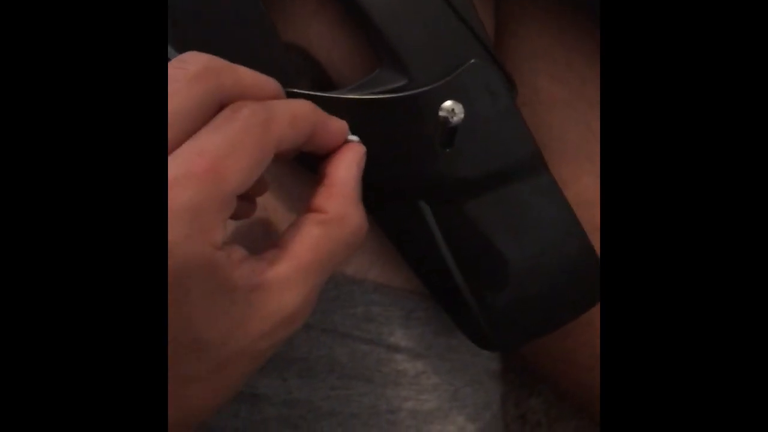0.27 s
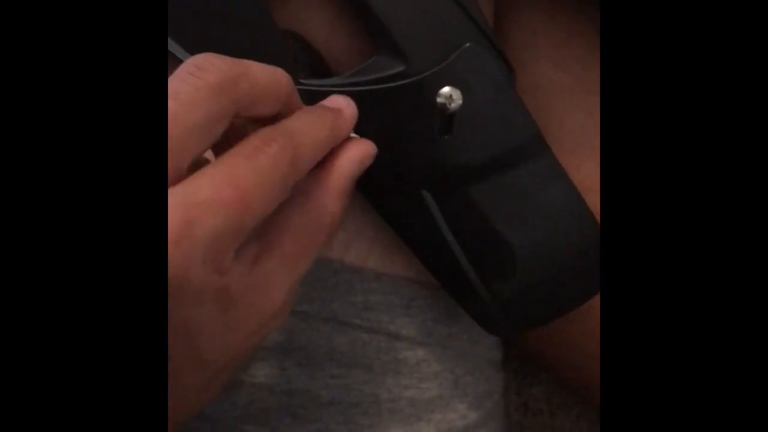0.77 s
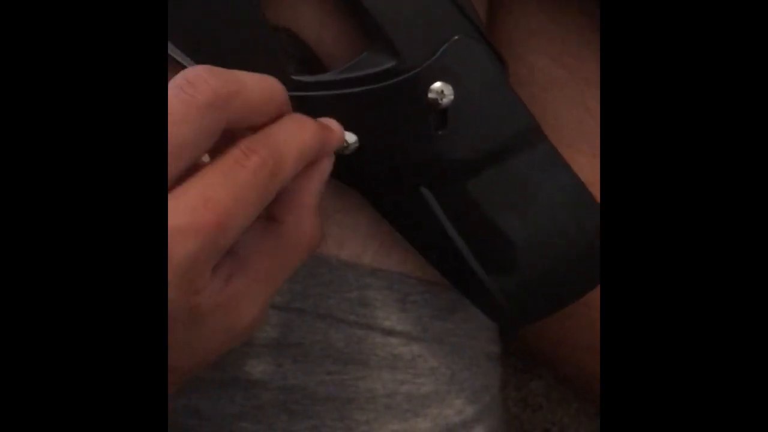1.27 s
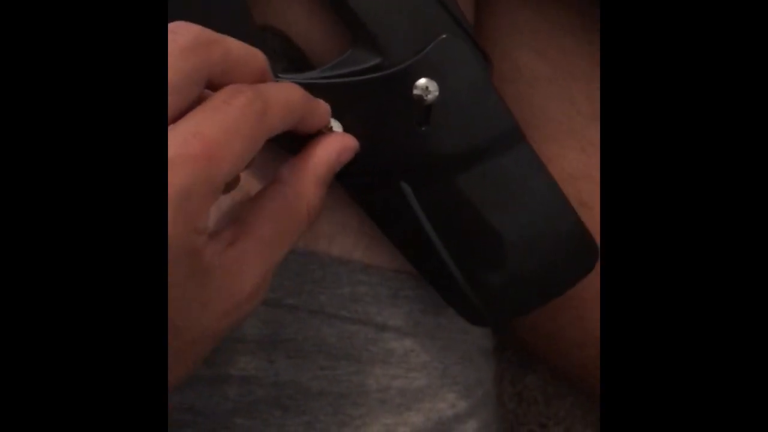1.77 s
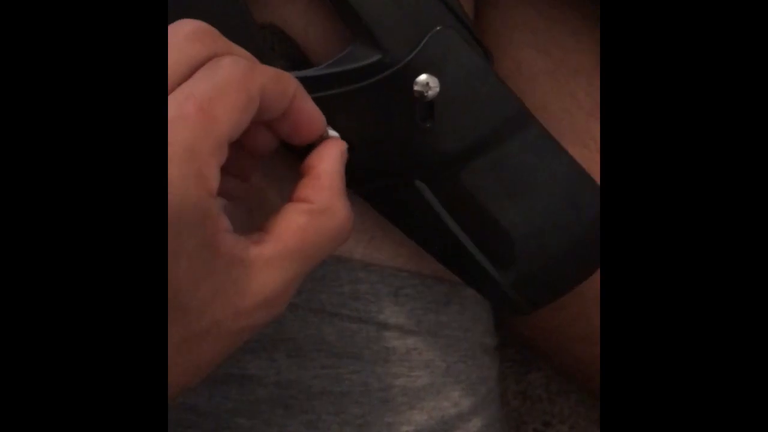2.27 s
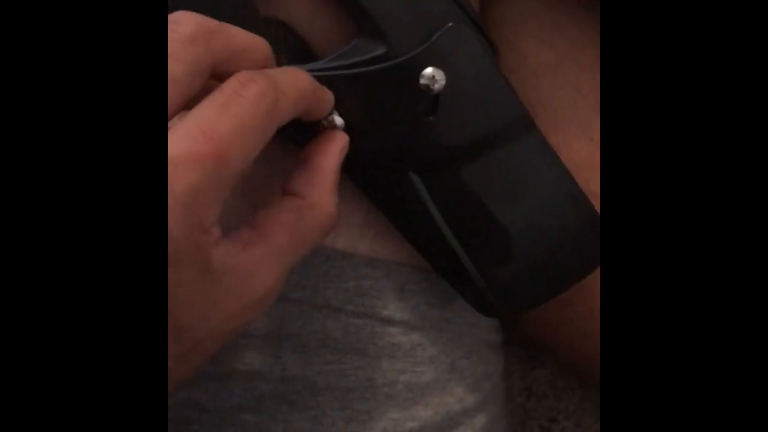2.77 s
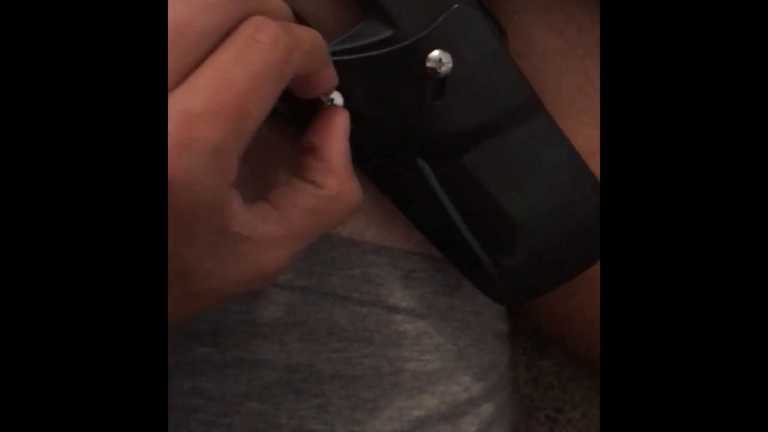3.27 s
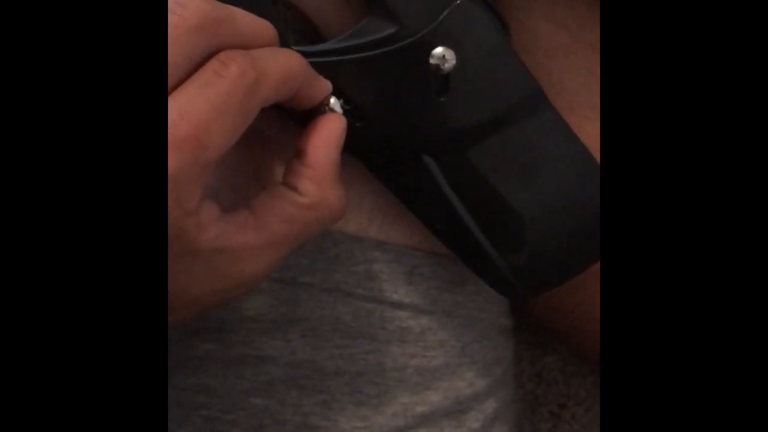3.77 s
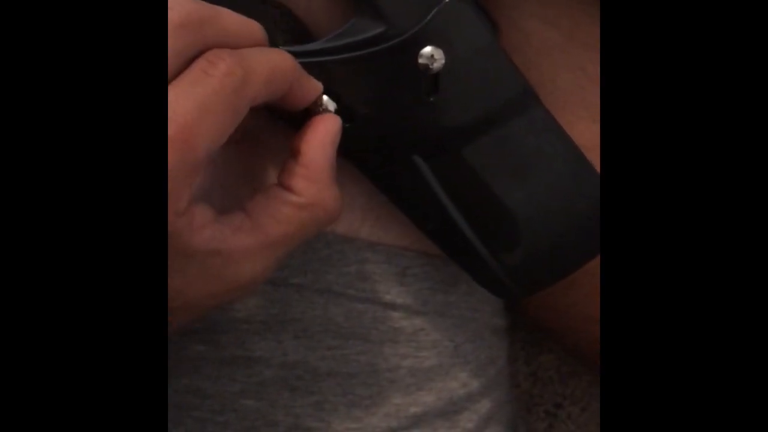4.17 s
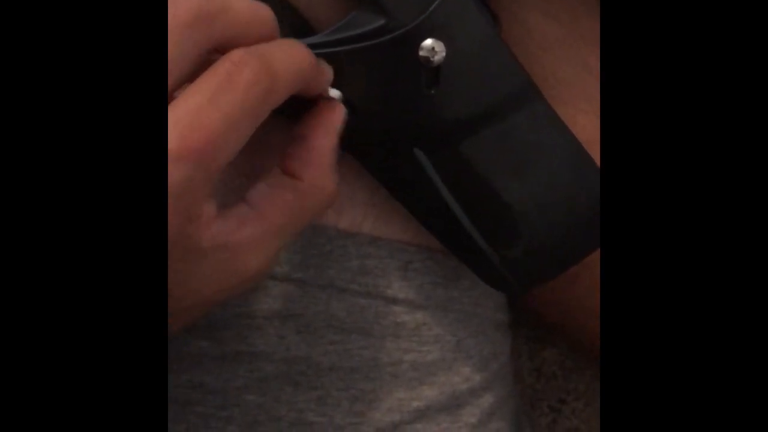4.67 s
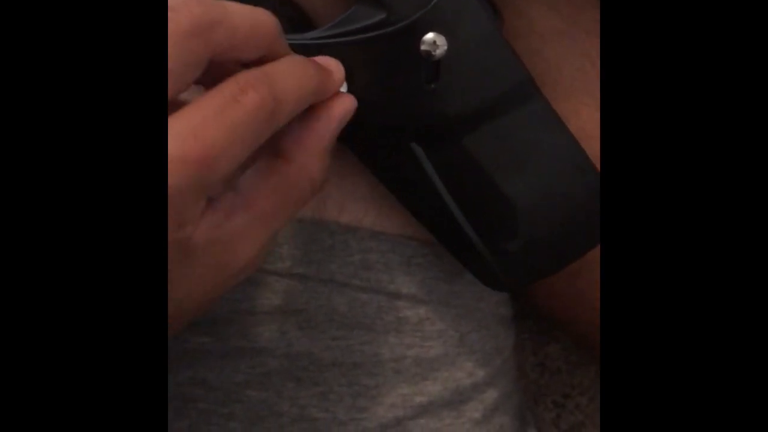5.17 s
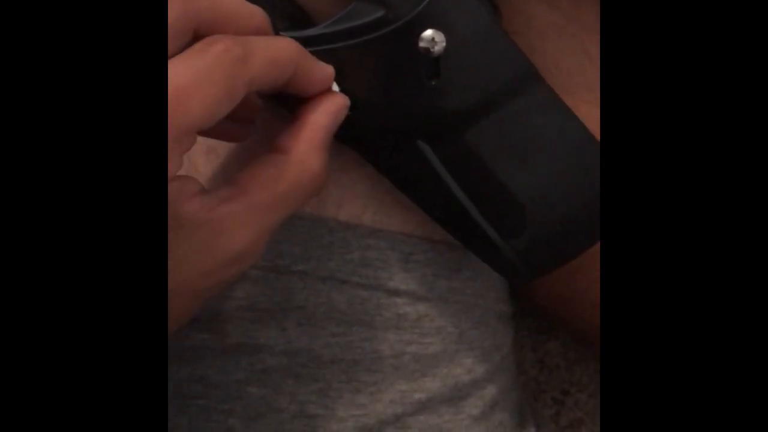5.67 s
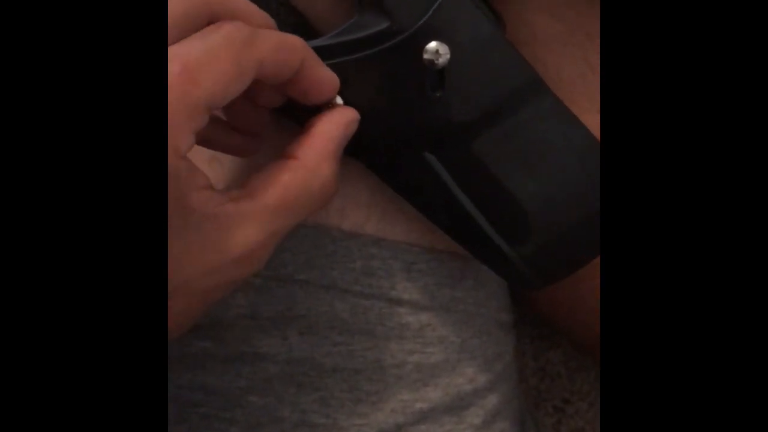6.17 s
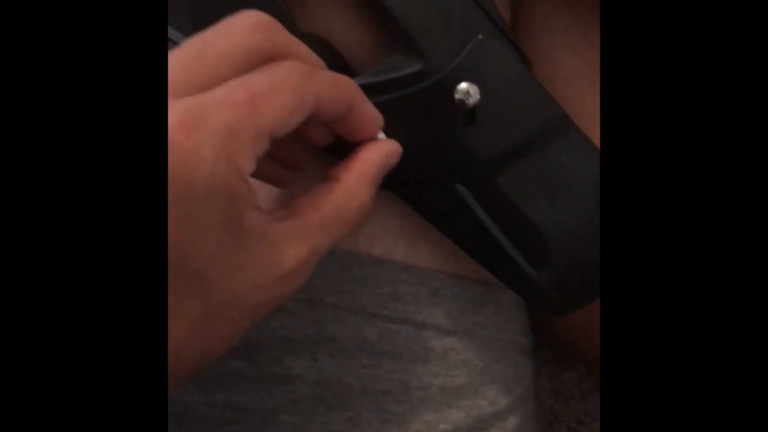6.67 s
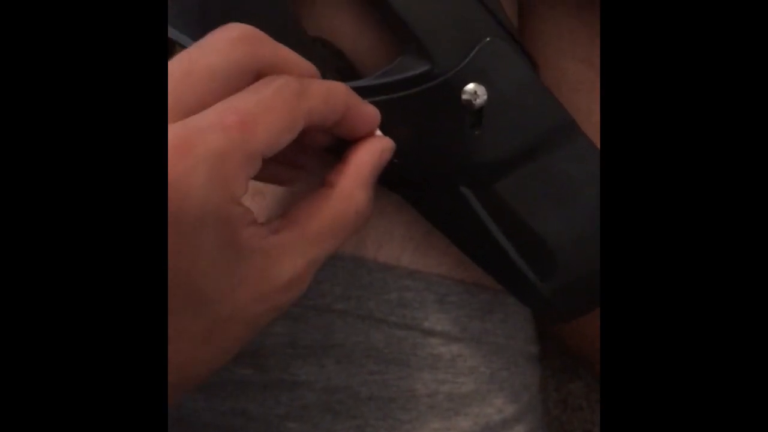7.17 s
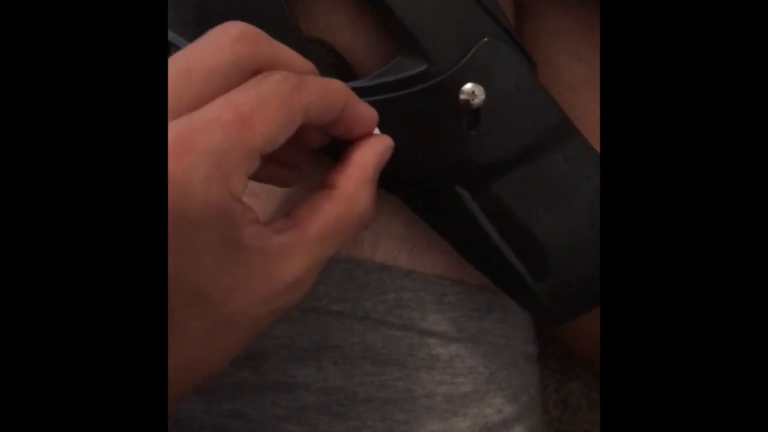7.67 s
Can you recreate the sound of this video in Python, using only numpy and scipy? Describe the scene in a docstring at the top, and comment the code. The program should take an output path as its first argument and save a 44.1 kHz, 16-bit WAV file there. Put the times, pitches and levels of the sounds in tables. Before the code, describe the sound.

Close to the microphone in a quiet room, a small metal screw is tried in the hole of a hard plastic helmet. Light taps lead to two quick clusters of sharp clicks, then tiny thread ticks and faint finger rubbing. A single snap, another cluster and a last snap follow, with lulls between them. The helmet thuds softly now and then, and appliances hum faintly behind it.

```python
"""Small screw on a plastic helmet

Close microphone, quiet room. Fingers try a metal screw in the hole of a hard helmet: it taps, skids and
snaps, ringing the modes of the shell, and its thread catches in tiny ticks. Fingertips rub the plastic,
the helmet thuds softly on a knee, and appliances hum faintly behind it all.
After the sharpest snaps the recorder holds a coarser, hissier range for a moment."""
import sys
import numpy as np
from scipy import signal
from scipy.fft import rfft, irfft, next_fast_len
from scipy.io import wavfile
from scipy.ndimage import uniform_filter1d, map_coordinates

SR = 44100
rng = np.random.default_rng(int(sys.argv[2]) if len(sys.argv) > 2 else 0)


def materialize(psi):
    """Save the field psi as 16-bit PCM at rate SR to the path in sys.argv[1].

    A 1-D psi becomes a single channel; in a 2-D psi each row is a channel.
    """
    bounded = np.clip(np.atleast_2d(psi).T, -1, 1)
    quanta = np.round(bounded * 32767).astype(np.int16)
    wavfile.write(sys.argv[1], SR, quanta)


N = 348387

# screw on shell: t/s, click level/dB, shell knock/dB re click, metal tick/dB re click,
# ping of the screw/dB re clack of the plastic (together the click), favoured shell resonance f/Hz
TAPS = [(0.1456, -40.5, 0.5, -21.5, -12, 2260), (0.2213, -36.5, -3, -0.5, 7, 1240),
        (0.3787, -58, 8, -8, 4, 1270), (0.5582, -72, 14.5, -5, -4, 1230),
        (0.7096, -45, 10.5, -10.5, -2, 1230), (0.7131, -20.5, -10, 0.5, 9, 1340),
        (0.7181, -21, -10, -3, 1.5, 1610), (0.7285, -37.5, -3.5, -9, 2, 1360),
        (0.7756, -44.5, 1.5, -13, 5, 2140), (0.8322, -41.5, -1.5, -18, -9, 1590),
        (0.8408, -35, -4, -4, 4, 1310), (1.1162, -33.5, -4.5, -18, -1.5, 1310),
        (1.1241, -23, -15, -15.5, 8, 2300), (1.1395, -32.5, -4, -14, 2.5, 2300),
        (1.159, -36.5, -1, -3, -2, 1360), (1.1746, -26.5, -12, -6.5, 4, 2220),
        (1.176, -35.5, -1, 4, 0, 2150), (1.1931, -36.5, -1.5, -16, 8, 1580),
        (1.3864, -51, 5, -7.5, 9, 1310), (1.4537, -51.5, 2, -25, 3, 1310), (1.5388, -44.5, 0, -5, 4, 1270),
        (1.6689, -48, -5, -14, 1, 2340), (1.698, -53.5, -21, -13, 3, 1270), (1.713, -46, -6, -11, 2, 1285),
        (1.9098, -55, -4.5, -12, 2, 1700), (2.2129, -56, -0.5, -13.5, -0.5, 2680),
        (2.3338, -21, -6.5, -1, 5.5, 1290), (2.574, -52, 1, -7, -6, 1140), (2.59, -39, 0, -18.5, -9, 1280),
        (2.6189, -37.5, 1, -10, -1, 2240), (2.7246, -52, -5, -5.5, -1, 2130),
        (2.8175, -56, -1, -6.5, -5, 2200), (3.0989, -36.5, 1, -28, 4.5, 1190),
        (3.3804, -58.5, 8.5, -10.5, -9.5, 1710), (4.25, -63, 3.5, -15.5, -11.5, 1360),
        (4.4769, -55.5, 9.5, -3, -3.5, 900), (4.7817, -62.5, 11.5, -17, -4.5, 1360),
        (4.918, -51.5, 12, -22.5, -7, 2300), (4.9221, -26.5, -7.5, 2, 5.5, 1510),
        (4.9974, -32, -4, -9, -2.5, 2150), (5.0077, -28.5, -2.5, -7, 7, 2240),
        (5.011, -22, -7.5, -5.5, 4.5, 1340), (5.524, -55.5, -3, -11.5, -4, 1570),
        (6.5965, -56, 6.5, -8, 1, 2145), (6.6074, -44.5, -3, -5.5, 5, 1524),
        (6.839, -47.5, -6, -12.5, 1, 1083), (6.917, -53, 2.5, -5.5, 3.5, 980),
        (7.2726, -19.5, -9, 2, 0, 2310), (7.3396, -41.5, -3.5, -9.5, 0, 1340),
        (7.394, -44.5, -4, -1.5, 9.5, 1360), (7.5559, -50.5, -2.5, -9, -4, 1074),
        (7.7189, -64, 12.5, -3, 5, 1590)]
LIGHT_TOUCH_DB = -54.5  # reference click level for thread ticks and scrapes


def amp(db):
    """Decibels to amplitude."""
    return 10 ** (np.asarray(db) / 20)


def unit(x):
    """Scale to rms 1."""
    return x / np.sqrt(np.mean(x ** 2) + 1e-20)


def along(points, hz):
    """Interpolate (f/Hz, value) points on a log frequency axis."""
    f, v = np.transpose(points)
    return np.interp(np.log(hz + 1), np.log(f + 1), v)


def filtered(x, response):
    """Apply a gain that is a function of frequency."""
    n = x.shape[-1]
    m = next_fast_len(n + 8192)
    return irfft(rfft(x, m) * response(np.fft.rfftfreq(m, 1 / SR)), m)[..., :n]


def noise(spectrum, size=N):
    """Noise of rms 1, coloured by (f/Hz, relative level/dB) points."""
    return unit(filtered(rng.standard_normal(size), lambda hz: amp(along(spectrum, hz))))


def wobble(rate):
    """A smooth random curve, rate knots a second."""
    knots = rng.standard_normal(int(N * rate / SR) + 4)
    return map_coordinates(knots, [np.arange(N) * rate / SR])


def add(track, s, sound):
    """Mix a sound in at s seconds."""
    part = track[max(round(s * SR), 0):][:len(sound)]
    part += sound[:len(part)]


def swells(peaks, rise_s, fall_s):
    """An envelope that builds up to each (t/s, level/dB) peak and dies away."""
    out, t = np.zeros(N), np.arange(-SR // 8, SR // 8) / SR
    for s, db in peaks:
        add(out, s + t[0], amp(db) * np.exp(-np.maximum(-t / rise_s, t / fall_s)))
    return out


def room_tone(hiss_db=-71.0, rumble_trim_db=0.5, sway_db=0.07, drift_rad=0.42):
    """Slightly unsteady appliance hum over the rumble of the room and thin microphone hiss."""
    hum_lines = [(59.3, -63.5), (96.8, -64), (119.2, -70), (145, -80)]  # appliance tones: f/Hz, rms level/dB
    rumble_levels = [(0.0, -57), (0.44, -61), (2.55, -59.5), (2.9, -61), (7.68, -59.5), (7.9, -61)]  # rumble of room and hand-held microphone: t/s, level before trim/dB
    rumble_colour = [(18, -32.5), (32, -14), (45, -1), (75, -1.5), (105, -3), (145, -8), (180, -15.5),
                     (310, -16), (480, -23), (1200, -27.5), (2200, -37), (5000, -56.5)]  # its spectrum: f/Hz, relative level/dB
    hiss_colour = [(200, -11), (2000, 0.5), (3700, 3), (4900, -1), (5600, 3), (6800, -1), (7700, -4),
                   (8700, 0), (9000, 3), (9300, -2), (10400, -5), (13000, 2.5), (14000, 1.5), (15600, 4)]  # steady hiss: f/Hz, relative level/dB
    t = np.arange(N) / SR
    hum = sum(amp(db) * np.sqrt(2) * np.sin(2 * np.pi * hz * t + drift_rad * wobble(5.4))
              for hz, db in hum_lines)
    rumble_db = rumble_trim_db + np.interp(t, *np.transpose(rumble_levels)) + sway_db * wobble(6.2)
    return hum + amp(rumble_db) * noise(rumble_colour) + amp(hiss_db) * noise(hiss_colour)


def contacts(rows, crack_db, crack_t60, scatter_db, hardening=0.17,
             rise_cycles=0.7, focus_db=5, focus_octaves=0.25, detune=0.014):
    """One blow per row (columns as TAPS): screw and shell ring under a noisy crack."""
    modes = [(227, -14, 0.043), (390, -17.5, 0.042), (659, -15, 0.049), (924, -6.5, 0.019),
             (1177, -2, 0.025), (1340, -1.5, .032), (1610.5, -3.5, 0.029), (1812, -5, 0.031),
             (2143, -1, 0.02), (2312, -2, .024), (2575, -6.5, 0.02), (3234, -4, 0.021), (3605, 3.5, .018),
             (4030, -2.5, 0.019), (4498, -9.5, 0.0085), (5520, 3.5, 0.015), (5930, 3, 0.0087),
             (6560, -5, 0.011), (8620, 7, 0.0067), (9450, -0.5, .009), (10470, -3.5, 0.0038),
             (11930, -2, 0.007), (11750, 0.5, .009)]  # resonances of screw and shell: f/Hz, relative level/dB, t60/s
    crack_colour = [(150, -15.5), (500, -23.5), (800, -18.5), (1300, -6.5), (2900, -9), (3700, 4.5),
                    (4800, -4), (6100, 9.5), (7600, -7), (9000, -2), (12000, -2.5), (16000, -9)]  # impact noise: f/Hz, relative level/dB
    closing_times = [(-50, .00034), (-22, .0002)]  # harder contacts close faster: click level/dB, closing time/s
    t = np.arange(SR // 25) / SR
    hz, db, t60 = np.transpose(modes)
    # the slow bending modes of the shell take longest to build up
    envelopes = amp(db - 60 * t[:, None] / t60) * (1 - np.exp(-t[:, None] * hz / rise_cycles))
    # a first crack, then a short dense shiver of the plastic
    snap = amp(-60 * t / crack_t60) + amp(-15.0 - 60 * t / 0.019)
    cracks = snap * noise(crack_colour, size=len(rows) * len(t)).reshape(-1, len(t))
    blows = []
    for (_, click_db, *_, spot_hz), crack in zip(rows, cracks):
        # each spot of the shell favours its own modes, and the grip detunes them
        favour_db = focus_db * np.exp(-(np.log2(hz / spot_hz) / focus_octaves) ** 2)
        favour_db += scatter_db * rng.standard_normal(len(hz))
        gripped_hz = hz * (1 + detune * rng.standard_normal(len(hz)))
        cycles = t[:, None] * gripped_hz + rng.random(len(hz))
        ring = (envelopes * np.sin(2 * np.pi * cycles)) @ amp(favour_db)
        # light touches start softly and crack less than hard ones
        onset_s = np.interp(click_db, *np.transpose(closing_times))
        attack = 1 - np.exp(-(t / onset_s) ** 2)
        blows.append((ring + amp(crack_db + hardening * click_db) * crack) * attack)
    return blows


def strike(rows, blows):
    """Balance and place the blows: bare metal pings and ticks, a finger-damped screw clacks and knocks."""
    edges_hz = [(120, 2800), (2800, 4700), (4700, 7500), (7500, 18000)]  # knock, clack, ping, tick
    filters = [signal.butter(4, edges, "band", fs=SR, output="sos") for edges in edges_hz]
    bands = np.array([signal.sosfilt(sos, blows) for sos in filters])
    bands /= np.sqrt(np.sum(bands ** 2, axis=2, keepdims=True) / (.005 * SR))  # energy of 5 ms at 0 dB
    out = np.zeros(N)
    for (s, db, knock_db, tick_db, ping_db, _), knock, clack, ping, tick in zip(rows, *bands):
        click = (clack + amp(ping_db) * ping) / np.hypot(1, amp(ping_db))
        add(out, s - .0005, amp(db) * (amp(knock_db) * knock + click + amp(tick_db) * tick))
    return out


def screw_taps():
    """The screw hits the shell: the sound towards the microphone, and a smoother blend to all sides."""
    near = contacts(TAPS, crack_db=24.0, crack_t60=0.0034, scatter_db=4.0, hardening=0.25)
    around = contacts(TAPS, crack_db=34.5, crack_t60=0.0028, scatter_db=2.0, hardening=0.07)
    return strike(TAPS, near), strike(TAPS, around)


def friction(grain_db=4, resting_db=-84, restless_db=3, scrape_db=-66, scrape_per_db=0.3224):
    """Fingertips and screw slide grainily over the plastic; the grip is never quite still."""
    rubs = [(0.433, 0.084, -77), (1.248, 0.057, -59.5), (2.603, 0.026, -55), (2.773, 0.042, -60.5),
            (2.99, 0.094, -70.5), (3.515, 0.036, -73), (5.76, 0.045, -73.5), (7.55, 0.015, -59.5),
            (7.722, 0.024, -65.5)]  # fingertip strokes: centre t/s, half length/s, level/dB
    skids = [(.713, -41.5), (5.011, -47.5)]  # the screw skids ever harder until it snaps home: snap t/s, level/dB
    rub_colour = [(300, -24.5), (850, -1.5), (1300, 1.5), (2000, -4.5), (2800, -12.5), (3700, -3),
                  (4800, -15), (6000, -7.5), (8000, -20), (16000, -29)]  # rubbed shell: f/Hz, relative level/dB
    t = np.arange(N) / SR
    stroke = sum(amp(db) * np.exp(-((t - s) / half) ** 2) for s, half, db in rubs)
    skid = swells(skids, rise_s=0.014, fall_s=0.005)
    # every tap also scrapes, the harder the louder
    scrape_peaks = [(s, scrape_db + scrape_per_db * (db - LIGHT_TOUCH_DB)) for s, db, *_ in TAPS]
    scrape = swells(scrape_peaks, rise_s=0.0036, fall_s=0.0062)
    grip = amp(resting_db + restless_db * wobble(14))
    grain = unit(noise(rub_colour) * amp(grain_db * wobble(300)))
    return (stroke + skid + scrape + grip) * grain


def room_reflections(x, wet_db=-20, gap_s=0.0076, wall_s=0.011, wall_db=-31):
    """A near surface answers once, then the furnished room dies away; the tail changes as hands move."""
    decay = [(200, 0.44), (1500, 0.3), (6000, .3), (15000, .2)]  # reverberation time: f/Hz, t60/s
    colour = [(200, 5), (1500, 3.5), (3500, -1), (6000, -3.5), (10000, 2.5), (16000, -1.5)]  # start of the tail: f/Hz, relative level/dB
    out, step = np.zeros(N), SR // 3
    for start in range(0, N, step):
        hz, t, spectra = signal.stft(rng.standard_normal(SR // 2), SR, nperseg=256)
        fade = amp(along(colour, hz)[:, None] - 60 * t / along(decay, hz)[:, None])
        _, tail = signal.istft(spectra * fade, SR, nperseg=256)
        wet = signal.fftconvolve(x[start:start + step], tail / np.linalg.norm(tail))
        add(out, start / SR + gap_s, amp(wet_db) * wet)
    add(out, wall_s, amp(wall_db) * x)
    return out


def thread_ticks(count=3, stray=0.11, spread_db=2, tick_db=-9, ping_db=0.5,
                 spot_hz=1328, spot_octaves=0.31):
    """The thread catches in tiny ticks, unevenly spaced over each turn of the fingers."""
    turns = [(0.384, 0.099, -73.5), (1.244, 0.057, -56), (1.376, .18, -60.5), (1.695, 0.06, -61),
             (2.749, 0.025, -64), (3.369, 0.038, -69), (4.329, 0.083, -71), (4.654, 0.25, -63.5),
             (5.074, 0.088, -64), (5.439, 0.18, -63.5), (6.473, .04, -74.5), (6.886, 0.028, -71.5),
             (7.503, 0.049, -56)]  # turns of the screw: start t/s, length/s, click level/dB
    rows = []
    for start, length, turn_db in turns:
        for k, (late, force, spot) in enumerate(rng.standard_normal((count, 3))):
            s = start + length * (k + .5 + stray * late) / count
            db = turn_db + spread_db * force
            knock_db = 0.5 * (LIGHT_TOUCH_DB - db)  # the lighter a touch, the more it is knock
            rows.append((s, db, knock_db, tick_db, ping_db, spot_hz * 2 ** (spot_octaves * spot)))
    return strike(rows, contacts(rows, crack_db=21.5, crack_t60=0.0085, scatter_db=1.5))


def coarse_range(x, threshold_db=-15.8, hold_s=0.405, hiss_db=-61.0):
    """Near overload the recorder switches to a noisier range and holds it, adding a spell of hiss."""
    hiss_colour = [(100, 10), (400, 7), (1200, 0.5), (4000, 0), (10000, -5.5), (15800, -3.5)]  # noise floor of that range: f/Hz, relative level/dB
    overload = uniform_filter1d(x[0] ** 2, size=88) > amp(threshold_db) ** 2  # power over 2 ms
    t = np.arange(N) / SR
    last_overload_s = np.maximum.accumulate(np.where(overload, t, -np.inf))
    return x + (t - last_overload_s < hold_s) * amp(hiss_db) * noise(hiss_colour)


def knee_bumps(rise_s=0.012):
    """The helmet shifts on the knee with dull thuds, each one damped low tone."""
    thuds = [(2.443, 67, -34, 0.21), (2.73, 62, -42.5, 0.24), (5.375, 76, -40, 0.26),
             (5.482, 70.7, -43, 0.28), (7.274, 277, -32, 0.045), (7.341, 380, -37, 0.04)]  # helmet on knee: t/s, f/Hz, level/dB, t60/s
    out, t = np.zeros(N), np.arange(SR // 2) / SR
    for s, hz, db, t60 in thuds:
        envelope = amp(db - 60 * t / t60) * (1 - np.exp(-t / rise_s))
        add(out, s, envelope * np.sin(2 * np.pi * hz * t))
    return out


def scene():
    """Mono, at the microphone: the helmet close up, the room faint behind it."""
    near, around = screw_taps()
    handling = thread_ticks() + friction()
    return (near + handling + room_reflections(around + handling) + knee_bumps() + room_tone())[None]


def record(dry, top_hz=15850):
    """The recorder: range switching, full-scale clipping and a steep band limit."""
    clipped = np.clip(coarse_range(dry), -1, 1)
    return filtered(clipped, lambda hz: 1 / np.sqrt(1 + (hz / top_hz) ** 200))


dry = scene()
out = record(dry)
materialize(out)
```